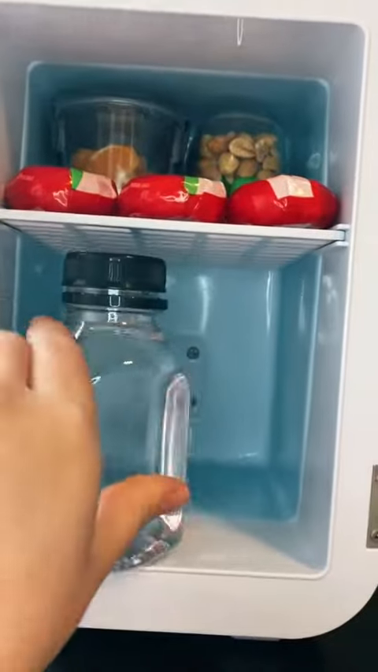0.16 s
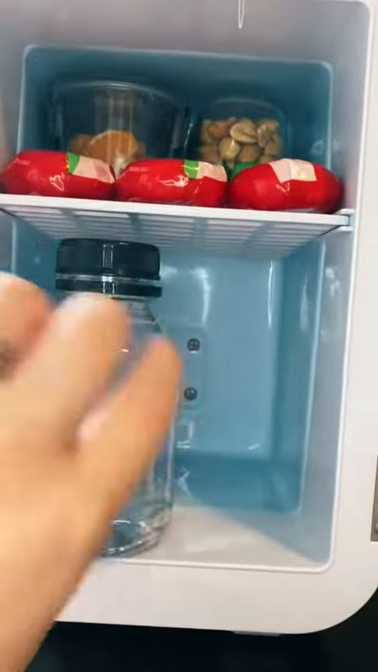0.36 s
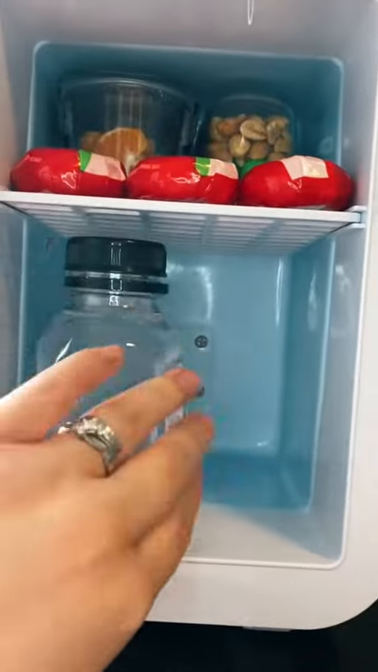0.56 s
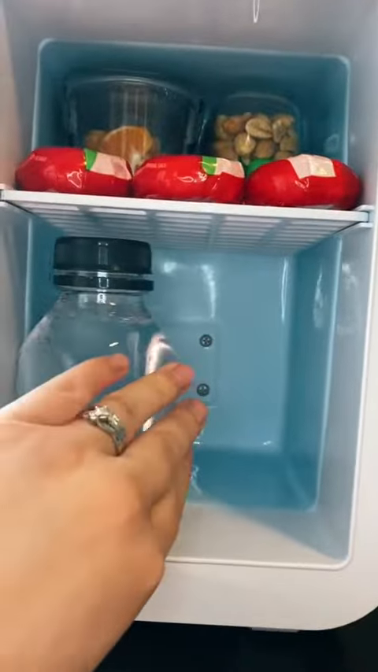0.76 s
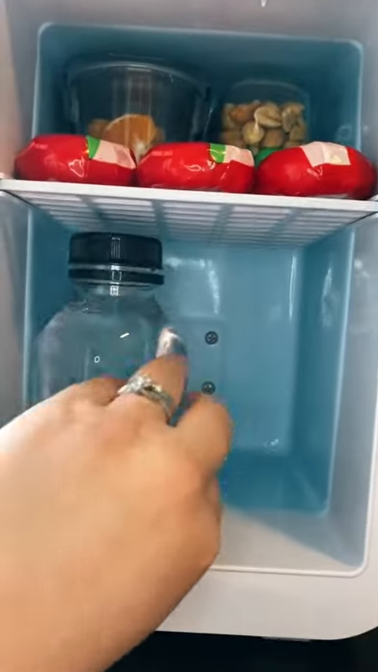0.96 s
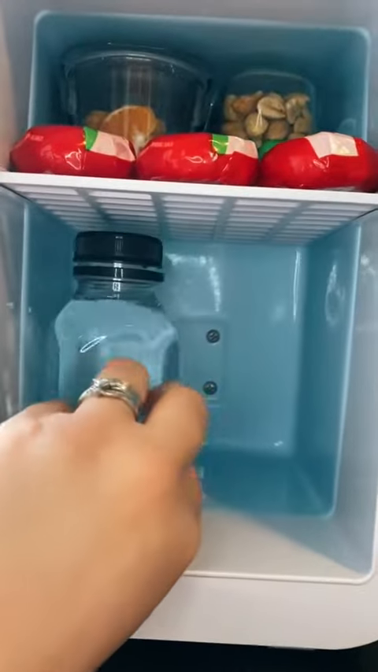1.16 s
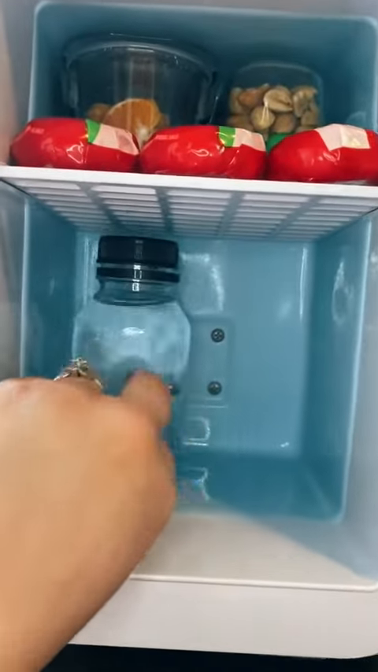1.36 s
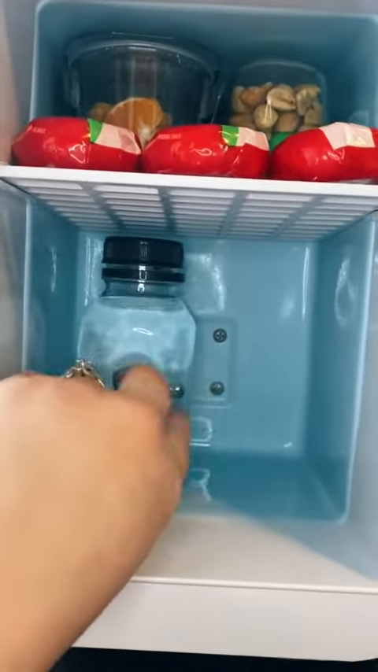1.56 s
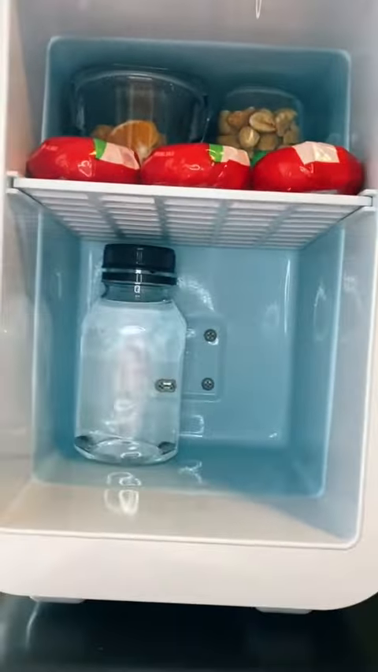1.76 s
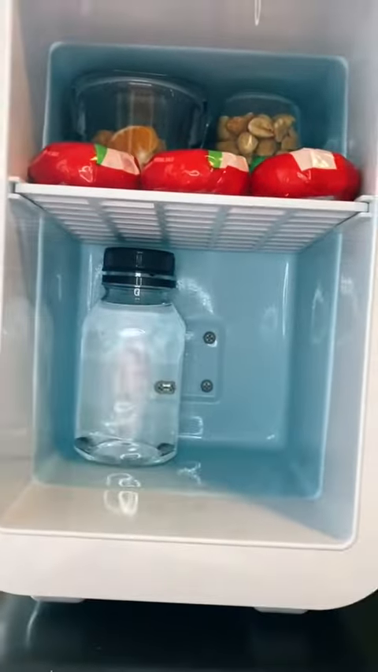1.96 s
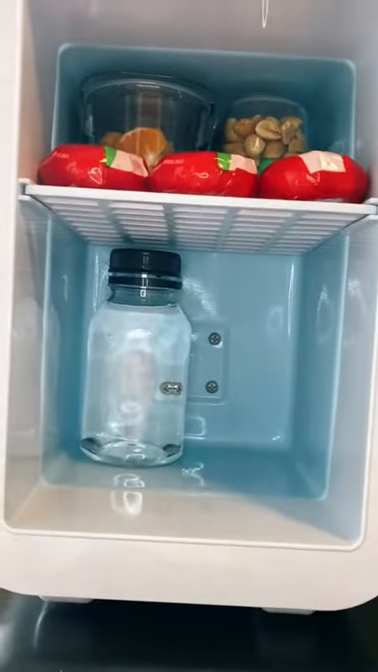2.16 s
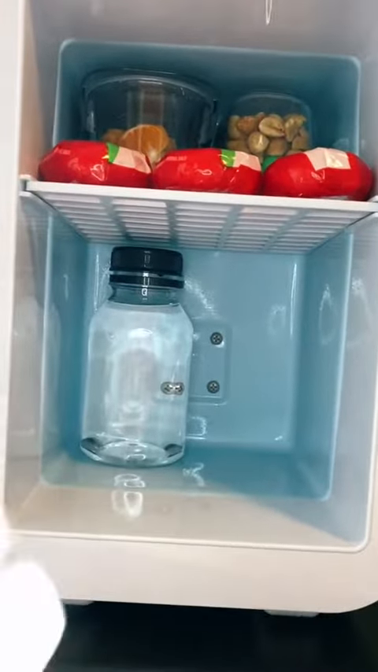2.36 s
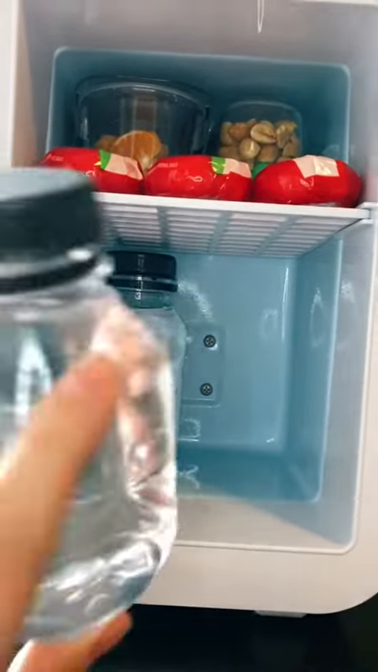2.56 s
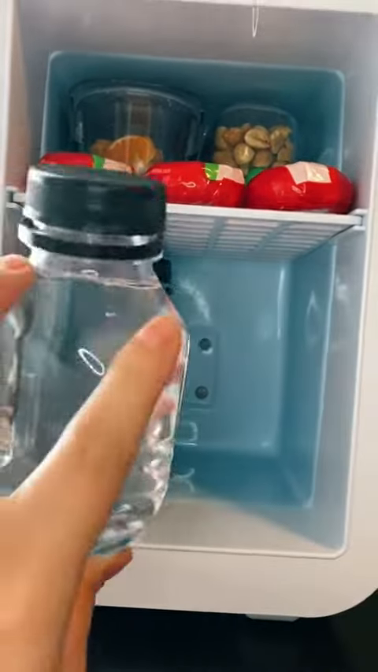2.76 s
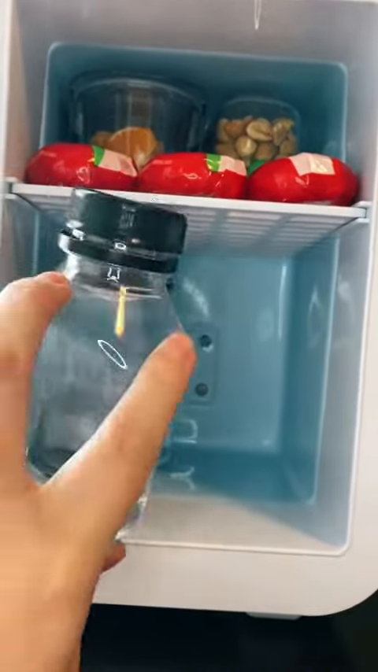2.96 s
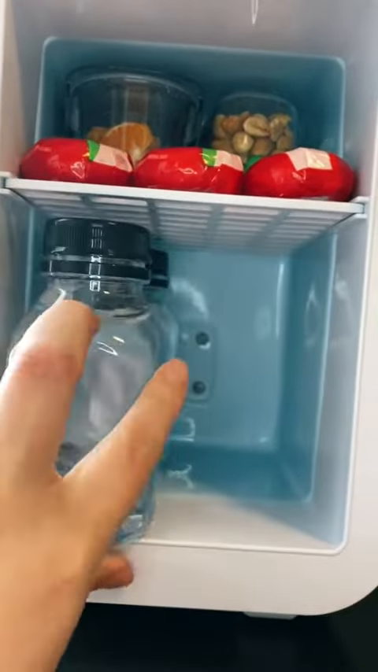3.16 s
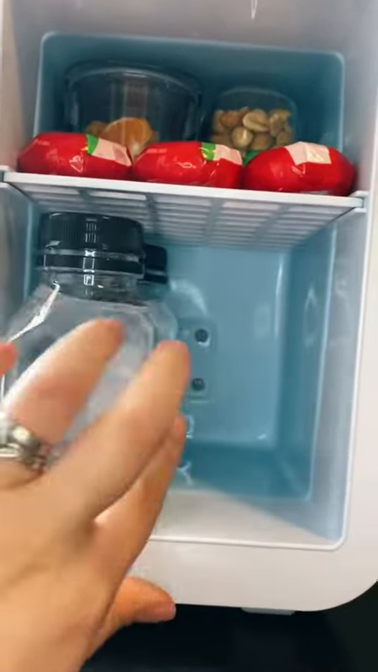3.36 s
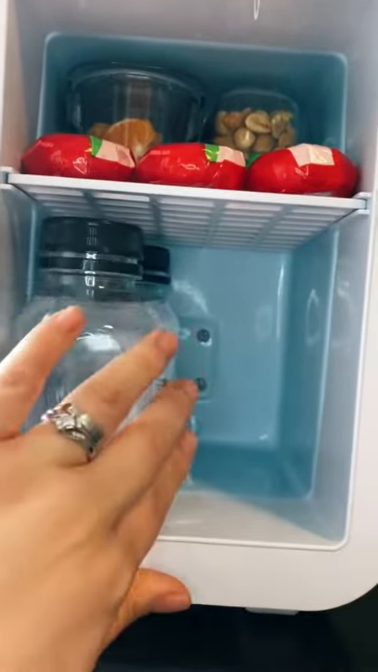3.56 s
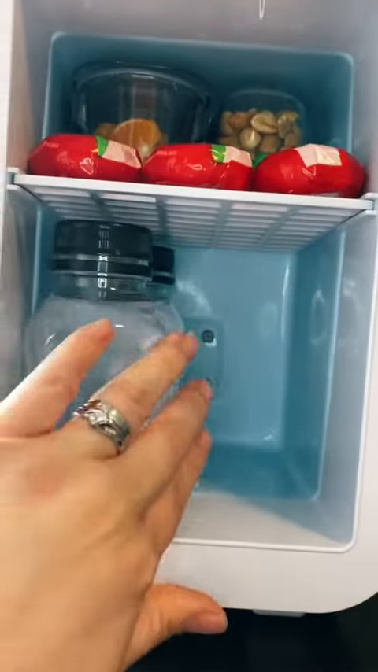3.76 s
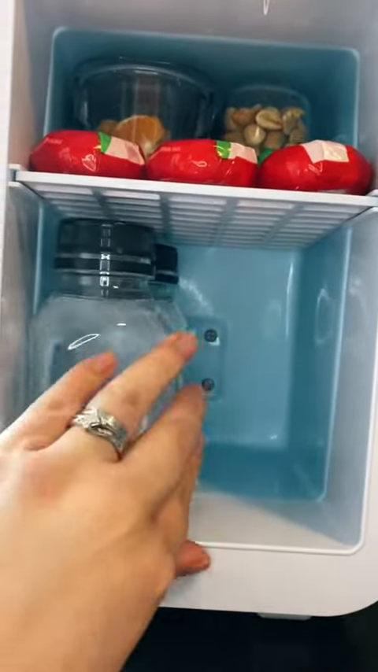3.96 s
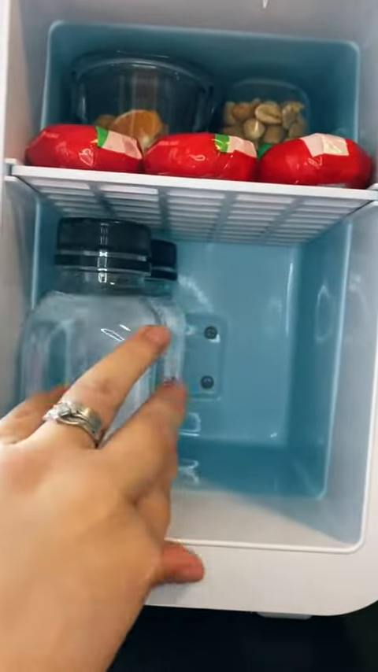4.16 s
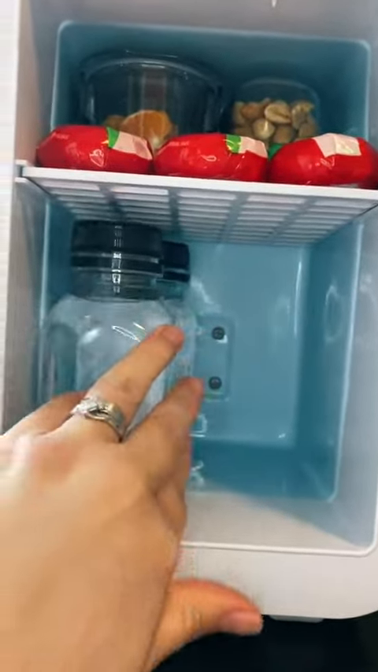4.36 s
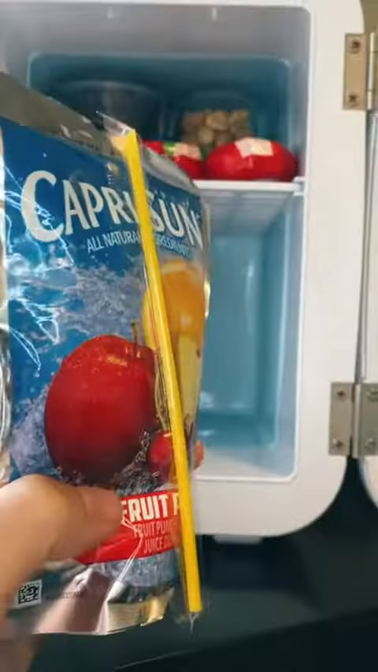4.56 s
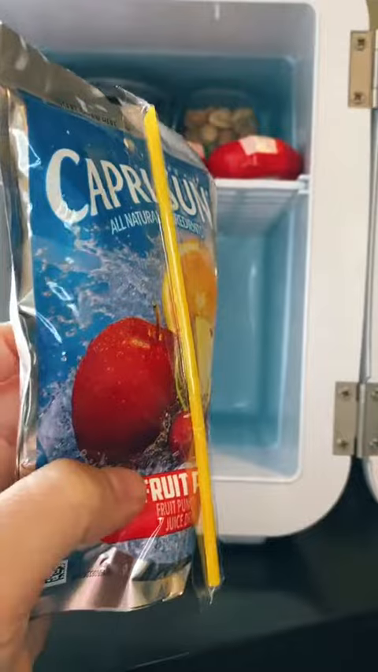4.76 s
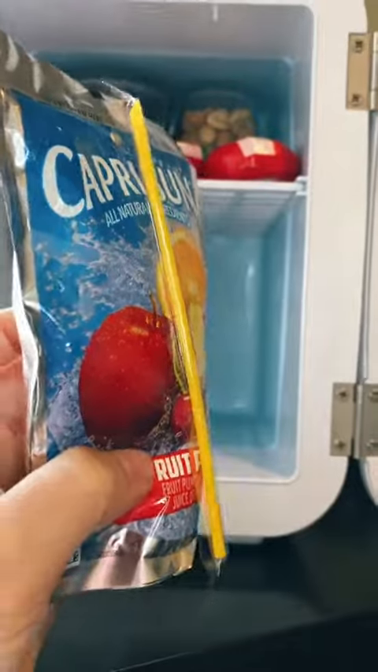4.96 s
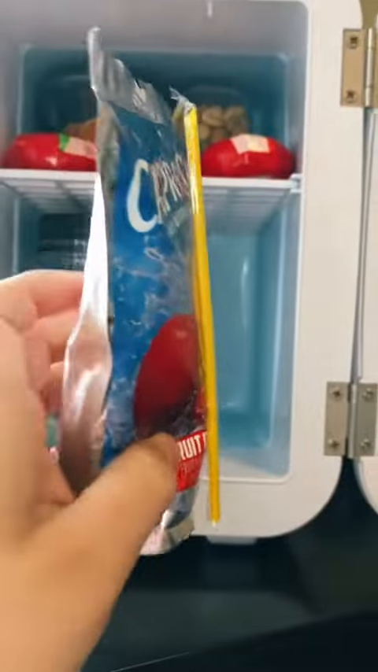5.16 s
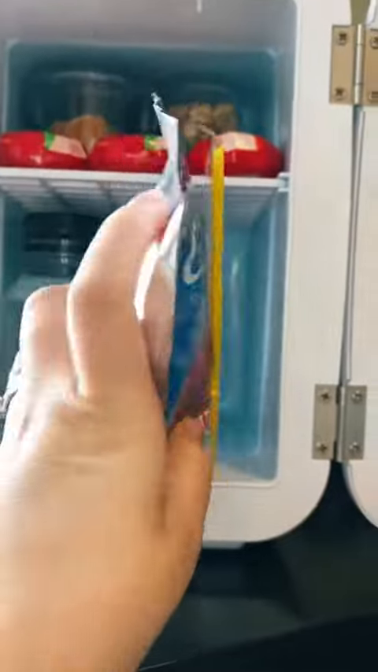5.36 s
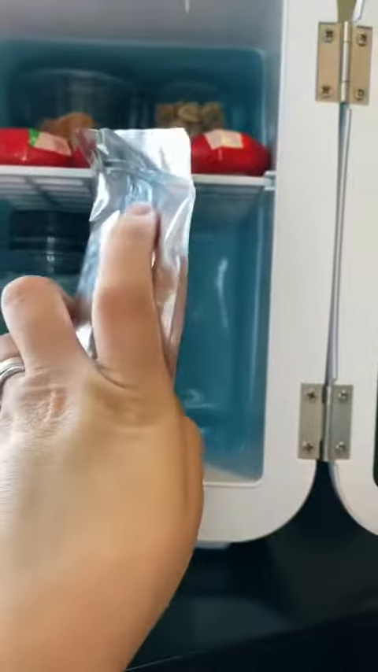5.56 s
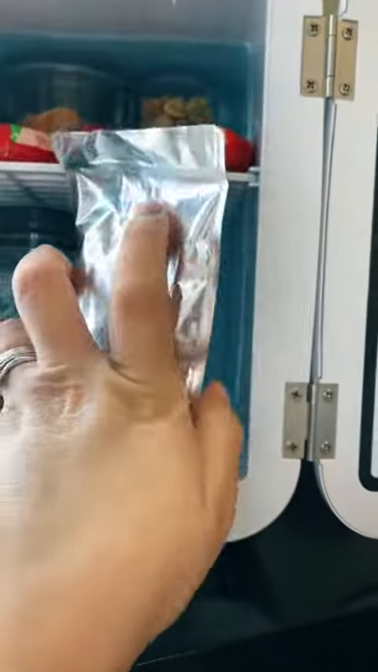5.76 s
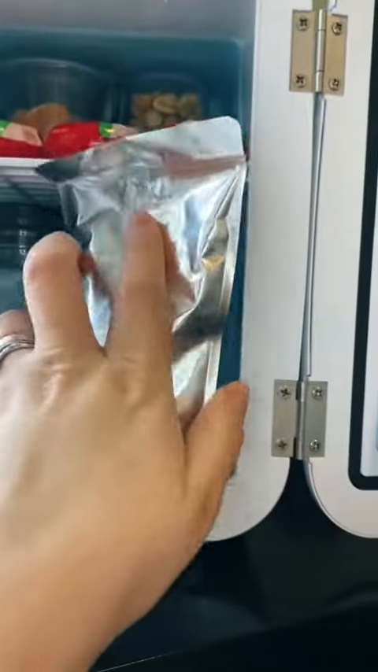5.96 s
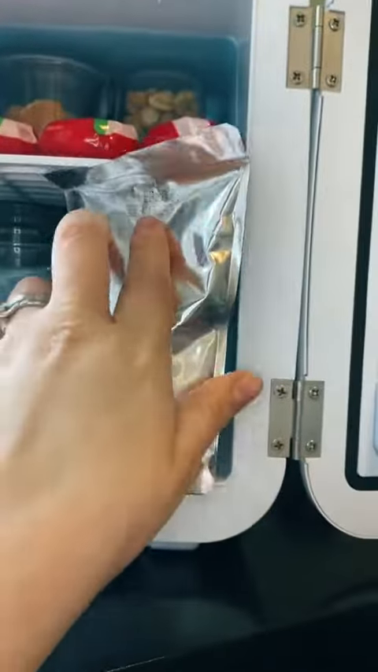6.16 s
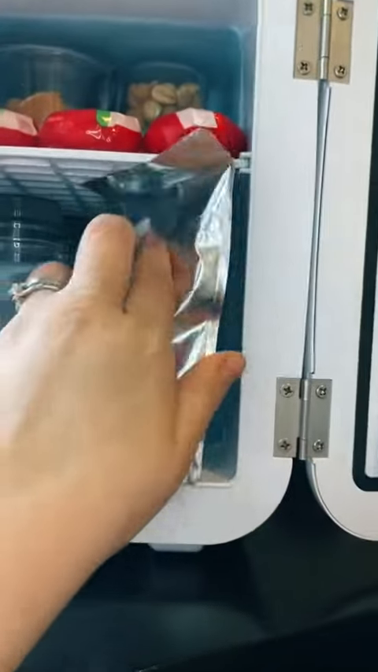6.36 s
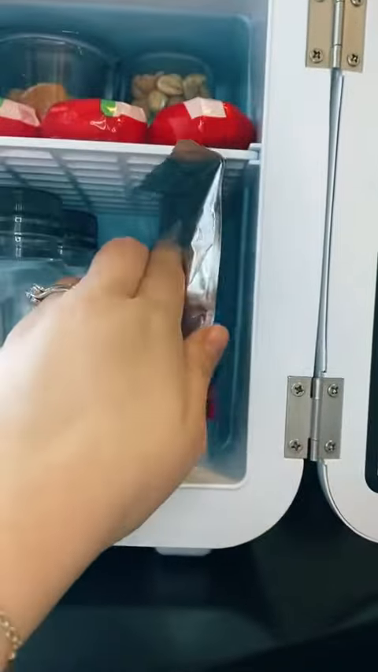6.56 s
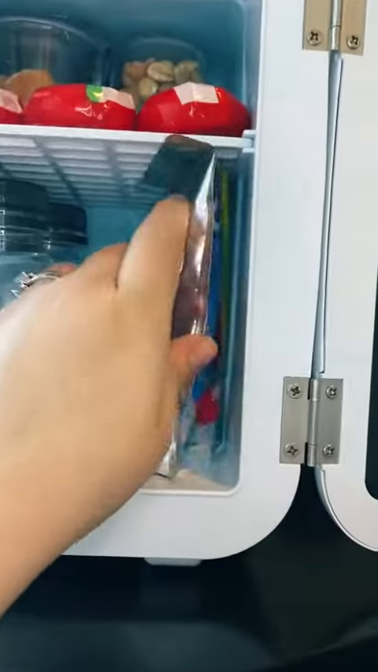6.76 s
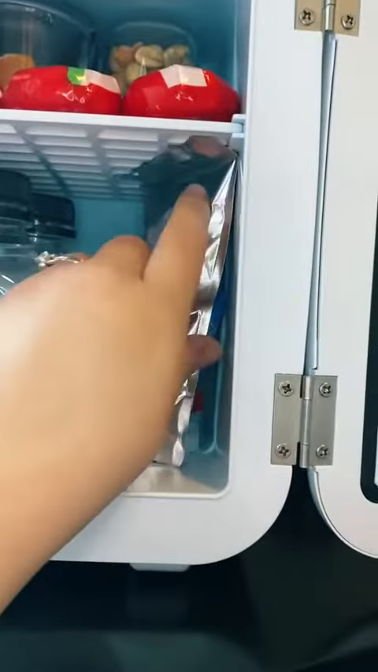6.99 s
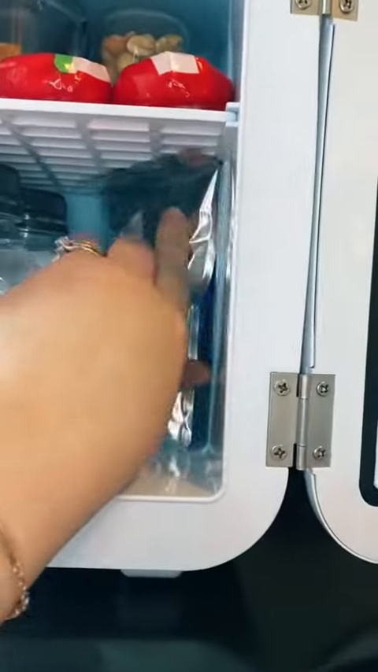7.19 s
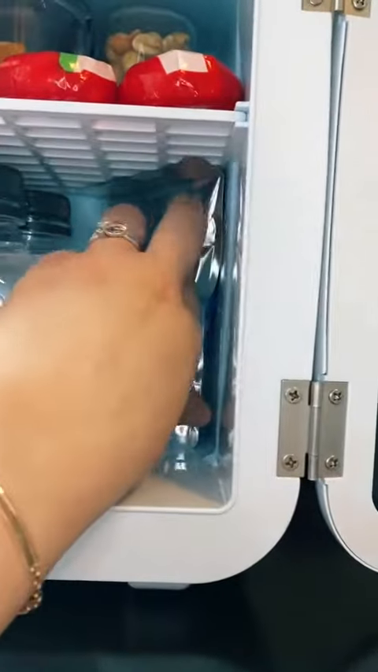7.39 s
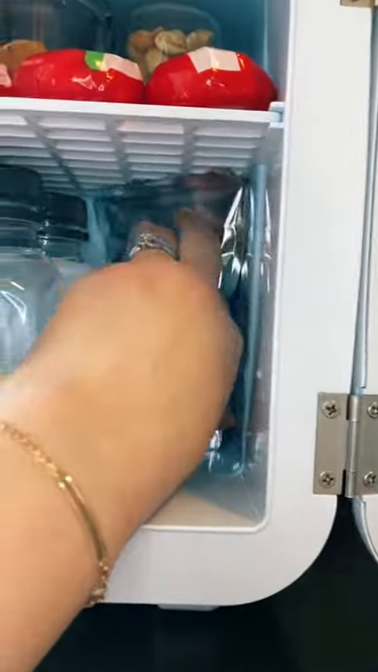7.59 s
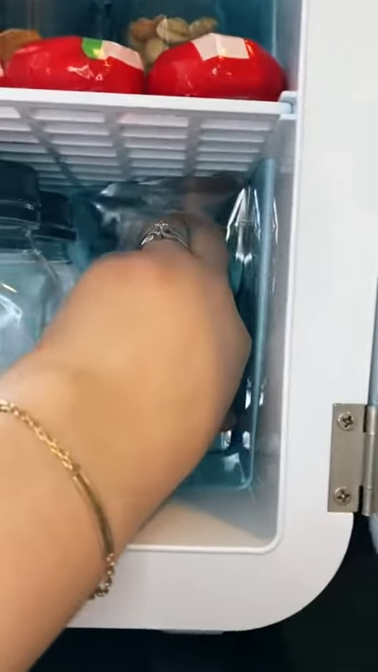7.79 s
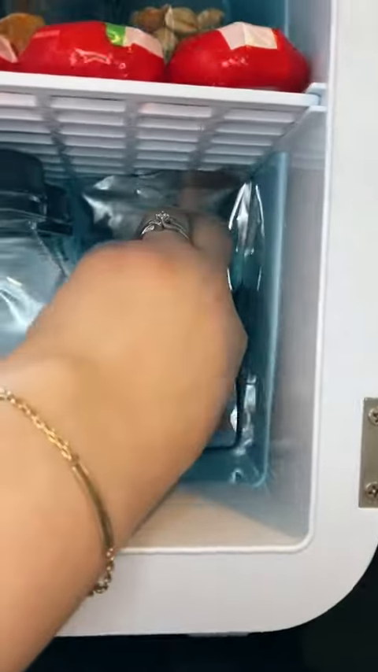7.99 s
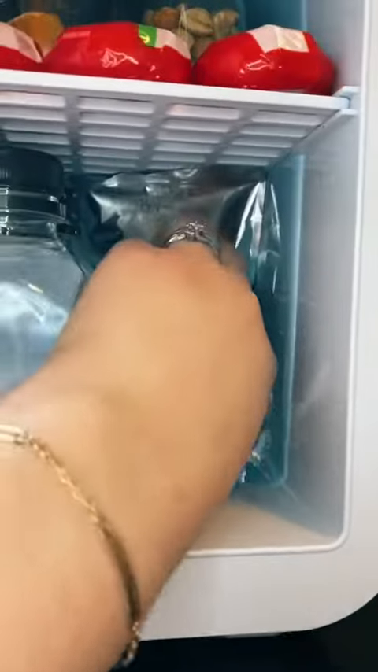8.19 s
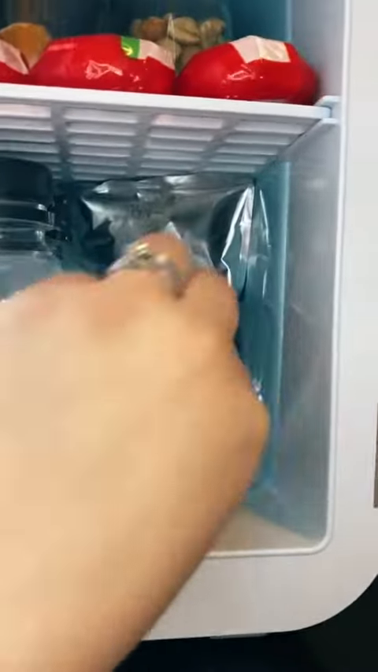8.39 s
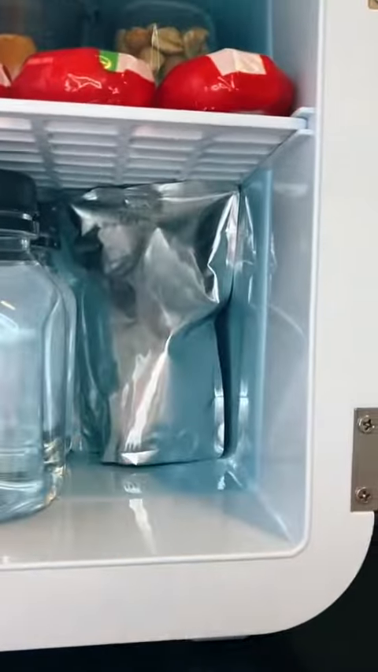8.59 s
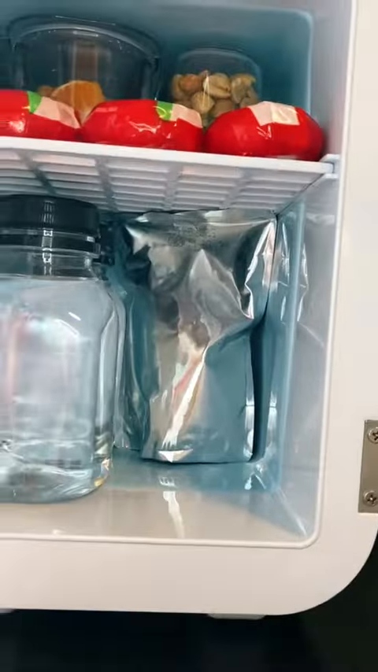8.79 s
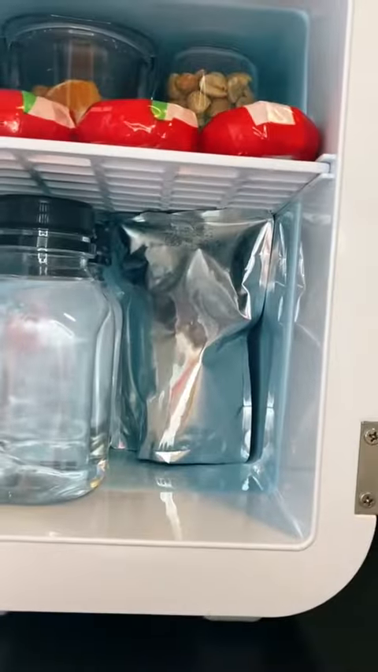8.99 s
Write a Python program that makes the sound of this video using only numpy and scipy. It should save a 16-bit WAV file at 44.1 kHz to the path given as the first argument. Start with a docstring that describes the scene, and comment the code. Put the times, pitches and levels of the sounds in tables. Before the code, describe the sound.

A faint fan hum runs throughout. Close up, a plastic bottle is set down and pushed back with clustered hollow clacks and a rubbing slide. After a quiet gap, a second bottle lands and knocks several times. A foil drink pouch then rustles, crinkles and snaps as it is shoved in, with a short squeak and soft bumps. Bottles knock lightly at the end. Small room, close microphone.

```python
"""A small fridge's cooling fan hums faintly throughout: shaped noise and slightly unsteady tones.
A plastic bottle is set down and pushed back, then a second: noise bursts and damped modes make each clack.
Next a foil drink pouch is pushed in beside them: it crinkles in tiny pops, and its snaps ring the rack.
It bumps the hollow compartment and squeaks on the wall; at the end the bottles knock once more.
All is close to the microphone in a small room, made from a decaying noise tail."""
import sys
import numpy as np
from scipy import signal
from scipy.fft import rfft, irfft, next_fast_len
from scipy.io import wavfile
from scipy.ndimage import uniform_filter1d, map_coordinates

SR = 44100
rng = np.random.default_rng(int(sys.argv[2]) if len(sys.argv) > 2 else 0)


def to_wav(sig):
    """Store sig (one row per channel, or 1-D mono) as 16-bit WAV at the path in sys.argv[1].

    Samples outside -1..1 are clipped; the rate is SR.
    """
    pcm = np.clip(np.atleast_2d(sig), -1, 1) * 32767
    pcm = np.round(pcm).astype(np.int16)
    wavfile.write(sys.argv[1], SR, pcm.T)  # frames by channels


N = 398223  # length in samples
CLOCK = np.arange(N) / SR  # s
T = np.arange(SR // 4) / SR  # time since a contact, s


def amp(db):
    """Decibels to gain."""
    return np.exp(np.asarray(db) * (np.log(10) / 20))


def unit(x):
    """Scale to rms 1."""
    return x / np.sqrt(np.mean(x ** 2) + 1e-20)


def blow(x):
    """Scale a transient to the energy of 20 ms at rms 1."""
    return x / np.sqrt(np.sum(x ** 2) / (SR / 50) + 1e-20)


def along(points, hz):
    """(f/Hz, value) points read on a log frequency axis."""
    f, value = np.transpose(points)
    return np.interp(np.log(hz + 1), np.log(f + 1), value)


def gains(rows):
    """A gain curve for each dB column after the time column; all but silent outside the rows."""
    s, *columns = np.transpose(rows)
    return [amp(np.interp(CLOCK, s, db, left=-120, right=-120)) for db in columns]


def wobble(rate):
    """A smooth random curve, rate knots a second."""
    knots = rng.standard_normal(int(N * rate / SR) + 4)
    return map_coordinates(knots, [np.arange(N) * rate / SR])


def filtered(x, response):
    """Multiply the spectrum of x by a complex response of frequency."""
    n = x.shape[-1]
    m = next_fast_len(n + 8192)
    spectrum = rfft(x, m) * response(np.fft.rfftfreq(m, 1 / SR))
    return irfft(spectrum, m)[..., :n]


def coloured(x, points):
    """Give x a broad spectral shape."""
    return filtered(x, lambda hz: amp(along(points, hz)))


def resonate(x, peaks):
    """Pass x through parallel resonances (f/Hz, width/Hz, level/dB) of alternating sign."""
    def bank(f):
        total = 0
        for k, (centre, width, db) in enumerate(peaks):
            damping = 1j * f * width
            total = total + (-1) ** k * amp(db) * damping / (centre * centre - f * f + damping)
        return total
    return filtered(x, bank)


def add(track, s, sound):
    """Mix a sound into the track at s seconds."""
    start = max(round(s * SR), 0)
    track[start:start + len(sound)] += sound[:max(N - start, 0)]


def ring(modes, rise, scatter_db, detune):
    """Damped modes (f/Hz, level/dB, t60/s), randomly varied in level and pitch at each contact."""
    chance = rng.standard_normal((len(modes), 2))
    waves = 0
    for (hz, db, t60), (level_chance, pitch_chance) in zip(modes, chance):
        decay = amp(db + scatter_db * level_chance - 60 * T / t60)
        waves = waves + decay * np.sin(2 * np.pi * hz * (1 + detune * pitch_chance) * T)
    return blow(waves * (1 - np.exp(-(T / rise) ** 2)))


def burst(rise, t60, tail_db, tail_t60):
    """A quick rattle of contact, then its weaker echoes between the fridge walls."""
    decay = amp(-60 * T / t60) + amp(tail_db - 60 * T / tail_t60)
    return decay * (1 - np.exp(-(T / rise) ** 2)) * rng.standard_normal(len(T))


def bend(x, cycles):
    """Bending waves in a thin wall: each frequency comes some of its own cycles late, so pitch falls."""
    return filtered(x, lambda hz: np.exp(-2j * np.pi * cycles * np.log(hz + 20)))


# spectrum of the fan's air noise: f/Hz, relative level/dB per Hz
FAN_AIR = [(25, -29), (55, -0.5), (100, -8), (160, -4.5), (240, -8), (300, -12), (420, -10.5), (800, -21),
           (1600, -17), (3000, -30.5), (4200, -43.5), (5300, -29), (6500, -52.5), (16000, -48)]
# motor and blade tones before the wavering: f/Hz, level/dB
FAN_TONES = [(215.3, -77), (242.2, -68), (1130, -85), (1222, -77.3), (1588, -74.2), (1803, -89),
             (2110, -86.5), (2385, -89)]
# the hum wavers in level: t/s, level/dB
FAN_WAVER = [(0, 4.5), (1.7, 3.5), (4.3, 5), (4.65, 0), (5.4, 2), (6, 4.5), (8.3, 4.5), (9, 3.5)]


def fan():
    """Soft turbulent air noise with motor and blade tones whose phase drifts slightly."""
    air = amp(-64.5) * unit(coloured(rng.standard_normal(N), FAN_AIR))
    tones = 0
    for hz, db in FAN_TONES:
        phase = 2 * np.pi * hz * CLOCK + 0.6 * wobble(5)
        tones = tones + amp(db) * np.sqrt(2) * np.sin(phase)
    return (air + tones) * amp(np.interp(CLOCK, *np.transpose(FAN_WAVER)))


# a bottle is set down or nudged: t/s, relative level/dB, weight on the floor/dB, hardness/dB,
# clack f/Hz, ring of the cap/dB, compartment f/Hz, shell f/Hz
BOTTLE_KNOCKS = [(0.049, -45.5, 5.5, -1.5, 1370, -19, 382, 170),
                 (0.1569, -28.5, 1.5, 5, 1720, -3, 384, 180), (0.579, -34.5, -4, -7, 980, -8, 404, 103),
                 (0.696, -27, -9, 6, 1510, -2, 357, 235), (0.719, -31.5, 2.5, -4, 1500, -12, 346, 91),
                 (0.739, -28, -12, -3, 1060, -27, 446, 160), (0.763, -35, -6, 1, 1000, -7, 429, 160),
                 (0.776, -33.5, -3, 2, 1410, -20, 413, 85), (0.795, -39.5, 6, -3.5, 1200, -1, 378, 91),
                 (0.82, -43, 10, -3, 1700, -1, 376, 86.5), (0.891, -24.5, -8.5, -8.5, 1010, -16, 406, 116),
                 (0.9, -49.5, -2, 10, 2060, -26, 444, 200), (0.919, -35, -9, -20, 1100, -22, 390, 118),
                 (0.932, -45, 0, -4, 1900, -25, 444, 119), (0.951, -35.5, -6, -4, 1930, -32, 377, 260),
                 (1.125, -46.5, 7, 1.5, 1203, -16, 437, 125), (1.208, -42.5, 2, -5, 1350, -2, 430, 186),
                 (1.344, -39.5, 4.5, -9, 1460, -22, 368, 105), (1.4097, -18, -5, -8, 1440, -7, 403, 215),
                 (1.412, -26, -8, 1.5, 676, -20, 489, 215), (1.435, -25.5, -10, -28, 750, -15, 359, 217),
                 (1.478, -29.5, -7, 2, 1440, -9.5, 395, 210), (2.955, -42, 3, -7, 1800, -14, 404, 233),
                 (3.0241, -25.5, 9, 4.5, 1050, -6.5, 396, 172), (3.031, -34, 0, 7, 650, -21, 345, 131),
                 (3.042, -24.5, 2.5, 2, 1020, -11, 404, 174), (3.052, -27, -2, 2.5, 650, -2.5, 352, 230),
                 (3.21, -57, -2, 6.5, 1600, -3, 382, 150), (3.312, -60, -10, 8, 1620, -7, 406, 150),
                 (3.538, -33, 0, -5, 1880, -0.5, 420, 152), (3.563, -30.5, 0.5, 0.5, 1350, -5.5, 412, 88),
                 (4.009, -28, -9, -7.5, 1920, -9, 398, 129), (4.034, -36, -3.5, -11, 1390, -4, 364, 102),
                 (4.272, -37.5, 3, 1.5, 980, -6, 430, 269), (4.283, -33, 0.5, -3, 1010, -3.5, 405, 119),
                 (4.296, -36, -12, 1, 1100, -11, 480, 169), (4.308, -23.5, -6, -8, 990, -13, 382, 260),
                 (4.317, -27, -9, -7.5, 1010, -12, 372, 130), (4.331, -30, -8, -5, 1010, -7, 380, 263),
                 (8.325, -44.5, -14, 5, 1290, 0, 380, 198), (8.337, -28.5, -8.5, -0.5, 1000, 1.5, 374, 161),
                 (8.403, -37.5, 3, 2, 1330, 0, 385, 90)]
# after a contact the bottle rocks onto its other edge, weaker and duller (s, then dB changes)
ROCK_S, ROCK_DB, ROCK_WEIGHT_DB, ROCK_HARDNESS_DB = .021, -15, 6, -3


def contacts():
    """Each knock and, unless the next one comes too soon, the rocking contact that follows it."""
    gaps = np.diff([row[0] for row in BOTTLE_KNOCKS], append=np.inf)
    for (s, db, weight_db, hardness_db, *colour), gap in zip(BOTTLE_KNOCKS, gaps):
        yield s, db, weight_db, hardness_db, *colour
        if gap > 2 * ROCK_S:
            yield s + ROCK_S, db + ROCK_DB, weight_db + ROCK_WEIGHT_DB, hardness_db + ROCK_HARDNESS_DB, *colour


def favoured(modes, hz, lift_db, octaves):
    """A contact point excites the modes near its own pitch more strongly."""
    lifted = []
    for f, db, t60 in modes:
        nearness = np.exp(-(np.log2(f / hz) / octaves) ** 2)
        lifted.append((f, db + lift_db * nearness, t60))
    return lifted


# spectra of the bottle's clack, its hard tick, and the fridge floor giving way: f/Hz, relative level/dB per Hz
CLACK_COLOUR = [(300, -23), (650, 3), (1100, 3.5), (1650, -3.5), (2300, -19), (3100, -14), (4500, -18.5),
                (9000, -46)]
TICK_COLOUR = [(1500, -1.5), (3200, 7), (5000, 7), (6200, 8), (7300, -39), (9000, -6.5), (15000, -9),
               (17000, -42)]
THUD_COLOUR = [(50, -22), (100, 12), (185, 12.5), (330, -12), (700, 4), (1500, -49)]
# resonances of the bottle, and of its stiff neck and cap: f/Hz, width/Hz, relative level/dB
BOTTLE_BODY = [(814, 16, 2.5), (983, 26, 10), (1060, 56, -9), (1510, 2460, -10.5), (1915, 266, 3)]
BOTTLE_CAP = [(2790, 2100, -2), (2958, 340, 4)]
# longer ring of a full bottle, the fridge's plastic shell, the air inside: f/Hz, relative level/dB, t60/s
BOTTLE_PING = [(631.5, 0.5, 0.19), (789, -15, 0.12), (985, 0.5, 0.094), (1084, -1, 0.091),
               (1407, -2.5, 0.096), (1588, 6.5, 0.037), (1790, -10.5, 0.28), (1906, -5.5, 0.08),
               (2755, -13.5, 0.16)]
SHELL_MODES = [(69.6, -11, 0.38), (90.8, -8.5, 0.36), (126.5, -5.5, 0.14), (177.7, -1.5, 0.22),
               (213.6, 2.5, 0.15), (250, 0, 0.12)]
HOLLOW_MODES = [(255, -5, .05), (342, -7, .08), (380, -10, .13), (441, -7, .07), (492, -8, .05)]
TICK_DB, TICK_GROWS = -10, 0.38  # the tick against the clack, and dB more per dB of the cap's ring


def bottles():
    """A hard tick and the bottle's clack come first; the compartment and shell swell just behind."""
    out = np.zeros(N)
    for s, hollow_db, weight_db, hardness_db, clack_hz, ring_db, hollow_hz, shell_hz in contacts():
        shell_db = hollow_db + weight_db
        clack_db = hollow_db + hardness_db
        cap_db = clack_db + ring_db
        tick_db = clack_db + TICK_DB + TICK_GROWS * ring_db
        # gentle nudges set in more slowly and tick less
        softness = np.interp(clack_db, [-50, -25], [2, 1])

        contact = burst(rise=0.0009 * softness, t60=0.022, tail_db=-22, tail_t60=0.16)
        wall = blow(coloured(contact, CLACK_COLOUR)) + amp(-6.0) * blow(resonate(contact, BOTTLE_BODY))
        # each contact point favours its own pitch
        spot = blow(resonate(contact, [(clack_hz, 300, 0)]))
        ping_modes = favoured(BOTTLE_PING, clack_hz, lift_db=9, octaves=.35)
        ping = ring(ping_modes, rise=.001, scatter_db=2.5, detune=.002)
        clack = blow(wall) + amp(-6) * spot + amp(-2) * ping
        cap = blow(resonate(resonate(contact, BOTTLE_CAP), BOTTLE_CAP))  # twice, for narrower peaks

        rattle = burst(rise=0.003 * softness, t60=0.014, tail_db=-34, tail_t60=0.31)
        tick = blow(coloured(rattle, TICK_COLOUR))
        give = burst(rise=.003, t60=.06, tail_db=-18, tail_t60=.18)
        thud = blow(coloured(give, THUD_COLOUR))
        shell_ring = ring([(shell_hz, 10, .075), *SHELL_MODES], rise=.0028, scatter_db=2, detune=.015)
        shell = amp(-5) * thud + shell_ring
        hollow = ring([(hollow_hz, 7, .05), *HOLLOW_MODES], rise=0.0045, scatter_db=1.5, detune=0.03)

        add(out, s, amp(clack_db - 12.0) * clack)
        add(out, s, amp(cap_db - 16.5) * cap)
        add(out, s, amp(tick_db - 10.5) / softness * tick)
        add(out, s + 0.0022, amp(hollow_db - 1.0) * hollow)
        add(out, s + 0.0014, amp(shell_db - 6.0) * bend(blow(shell), cycles=2.2))
    return out


def patchy(x, depth_db):
    """Foil facets sound in turn: random patches of gain, some 700 Hz wide and 25 ms long."""
    z = signal.stft(x, nperseg=256)[2]
    across_pitch = uniform_filter1d(rng.standard_normal(z.shape), size=4, axis=0)
    field = uniform_filter1d(across_pitch, size=9, axis=1)
    return signal.istft(z * amp(depth_db * unit(field)), nperseg=256)[1][:N]


def crackle(rate, low_hz, high_hz, spread_db, hiss, clump_db):
    """Tiny creases pop in loose clumps, each ringing a few cycles at its own pitch, over friction."""
    when, pitch, life, size = rng.random((int(rate * N / SR), 4)).T[:, :, None]
    hz = low_hz * (high_hz / low_hz) ** pitch
    t = T[:SR // 600]
    strength = amp(spread_db * -np.log(.06 + .94 * size))  # a few pops far stronger than most
    pops = strength * np.sin(2 * np.pi * hz * t) * np.exp(-t * hz / (.4 + life))
    at = (when * N).astype(int) + np.arange(len(t))
    clumps = amp(clump_db * wobble(60))
    rustle = unit(np.bincount(at.ravel(), pops.ravel())[:N]) + hiss * rng.standard_normal(N)
    return clumps * patchy(rustle, depth_db=1.6)


# fingers tighten on a bottle or on the pouch: t/s, half length/s, relative level/dB
GRIP_RUSTLES = [(0.124, 0.018, -65), (2.103, 0.017, -73), (4.016, 0.039, -63.5), (4.556, 0.015, -53),
                (4.57, 0.0049, -46.5), (4.62, 0.059, -64), (4.87, 0.28, -84.5), (5.024, 0.018, -73.5),
                (5.15, 0.039, -63), (5.253, 0.035, -68.5), (5.413, 0.024, -69), (5.488, 0.017, -55.5),
                (5.575, 0.011, -67), (5.679, 0.017, -54), (5.809, 0.0095, -51), (5.848, 0.017, -58),
                (6.026, 0.023, -63), (6.135, 0.011, -58.5), (6.264, 0.0083, -56), (6.533, 0.0032, -45),
                (6.576, 0.01, -43), (8.01, 0.012, -66), (8.072, 0.021, -54)]
# the pouch is pushed to the back: t/s, relative rub level/dB, relative crinkle level/dB
POUCH_PUSH = [(5.5, -82, -79), (5.76, -69, -60.5), (5.94, -49.5, -59.5), (6.1, -51.5, -63),
              (6.31, -47.5, -57.5), (6.49, -45.5, -54.5), (6.68, -64, -63), (6.82, -55.5, -65),
              (6.9, -43, -50.5), (7.05, -41, -49), (7.11, -37, -43.5), (7.26, -53, -56), (7.38, -46, -61),
              (7.5, -55.5, -53), (7.65, -43.5, -61), (7.77, -50.5, -57.5), (7.92, -53, -61.5),
              (7.99, -47.5, -57), (8.14, -49.5, -68.5), (8.3, -91, -97)]
# spectra of the crinkling foil and of the rubbing: f/Hz, relative level/dB per Hz
CRINKLE_COLOUR = [(1000, -15), (2000, -9), (2800, -11.5), (5100, -4.5), (6200, -5.5), (7300, -23),
                  (9000, -9.5), (12000, -12), (15300, -9), (16500, -25.5)]
RUB_COLOUR = [(350, -40), (600, 3), (738, -3.5), (934, -5), (1420, -4.5), (1860, -6.5), (2260, -0.5),
              (2680, -5), (3500, -8), (4550, -41), (7700, -120)]


def handling():
    """Gripping rustles briefly; the pushed pouch rubs and crinkles in uneven spurts of tiny pops."""
    rub, crinkle = gains(POUCH_PUSH)
    grip = sum(amp(db) * np.exp(-((CLOCK - s) / half) ** 2 / 2) for s, half, db in GRIP_RUSTLES)
    spurts = amp(1.5 * wobble(22))
    creases = crackle(rate=5000, low_hz=2500, high_hz=14000, spread_db=3.3, hiss=.65, clump_db=1.5)
    slips = crackle(rate=2500, low_hz=900, high_hz=3500, spread_db=3.2, hiss=.8, clump_db=1.3)
    foil = (amp(1.5) * crinkle * spurts + grip) * unit(coloured(creases, CRINKLE_COLOUR))
    skin_level = amp(-6.0) * rub * spurts + amp(-16.0) * grip
    return foil + skin_level * unit(coloured(slips, RUB_COLOUR))


# the first bottle is pushed over the floor: t/s, relative effort level/dB
BOTTLE_PUSH = [(0.55, -49), (0.636, -44.5), (0.766, -43), (1.004, -52), (1.176, -46.5), (1.344, -45),
               (1.446, -50), (1.574, -74), (1.7, -77)]
# spectrum of the muttering floor: f/Hz, relative level/dB per Hz
DRAG_COLOUR = [(21, -38), (35, -28.5), (108, -0.5), (150, -8), (189, 3), (216, -4.5), (246, 0),
               (296, -11.5), (384, 4), (427, 3), (547, -18.5), (800, -14.5), (1040, -36.5), (1760, -120)]
SKIN_DB = -26  # fingers slipping on the bottle, against the effort of the push
BOTTLE_DRAG_DB, POUCH_DRAG_DB = -2, -6  # muttering of the floor, against the effort and the rub


def sliding():
    """Fingers slip on the pushed bottle as uneven hiss; dragged loads make the fridge floor mutter."""
    effort, rub = gains(BOTTLE_PUSH)[0], gains(POUCH_PUSH)[0]
    slipping = rng.standard_normal(N) * amp(1.7 * wobble(30.9))
    skin = amp(SKIN_DB) * effort * unit(coloured(slipping, TICK_COLOUR))
    judder = rng.standard_normal(N) * amp(5 * wobble(35))
    load = amp(BOTTLE_DRAG_DB) * effort + amp(POUCH_DRAG_DB) * rub
    return skin + load * unit(coloured(judder, DRAG_COLOUR))


# a light tap on the compartment: f/Hz, relative level/dB, t60/s
TAP_MODES = [(353, -14.5, 0.13), (396, -11, 0.11), (491, -4.5, 0.013), (548, -2, 0.031), (633, -10, 0.043)]


def tap(hz):
    """The compartment's short answer to a light touch, pitched by where it lands."""
    hollow = ring([(hz, 2.0, 0.04), *TAP_MODES], rise=0.0027, scatter_db=4.0, detune=0.033)
    return blow(coloured(hollow, [(120, -11.5), (290, -2.5)]))


def buckling(swell, length, tail_db, tail_t60):
    """A crease gives way: noise swells to a peak 10 ms in, collapses in a few ms, then echoes faintly."""
    t = T - 1 / 100
    collapse = np.exp(-(t / length) ** 2) + amp(tail_db - 60 * np.abs(t) / tail_t60)
    shape = np.where(t < 0, np.exp(-np.abs(t) / swell), collapse)
    return shape * rng.standard_normal(len(t))


# the pouch buckles: t/s, relative panel level/dB, panel f/Hz, sharpness of the foil's crack/dB, compartment f/Hz
POUCH_SNAPS = [(4.564, -54.5, 3300, -7, 396), (5.187, -48, 2100, -24, 343), (5.462, -40.5, 940, -4.5, 367),
               (5.699, -53.5, 1380, -10, 532), (5.739, -62, 2150, 24, 400), (5.869, -41.5, 2630, -4.5, 456),
               (5.933, -37, 2490, -22, 445), (6.048, -40.5, 1700, -10, 357), (6.244, -43.5, 2180, -17, 405),
               (6.337, -39.5, 1940, 5.5, 394), (6.346, -36.5, 1510, -6.5, 407),
               (6.368, -25, 1760, -46, 349), (6.372, -29, 1020, -29, 349), (6.45, -39, 1970, 0.5, 400),
               (6.569, -48, 1500, -12.5, 403), (6.588, -23.5, 1990, 9.5, 440),
               (6.771, -42, 2150, -18.5, 402), (6.858, -46.5, 2410, 13.5, 400),
               (6.909, -24, 2020, 9.5, 473), (6.951, -33.5, 2395, -9, 434), (6.971, -43, 2350, 14, 404),
               (7.034, -29.5, 1860, -6.5, 442), (7.045, -28.5, 1960, 13.5, 368),
               (7.072, -36, 1840, -6.5, 330), (7.117, -28, 1940, 13, 383), (7.216, -24.5, 1280, 8.5, 470),
               (7.254, -29.5, 1330, 2.5, 457), (7.304, -55.5, 1300, 9.5, 400), (7.446, -36, 1320, -15, 446),
               (7.464, -25.5, 1300, 10, 480), (7.501, -24.5, 1240, -2.5, 448), (7.68, -25, 2180, 9, 414),
               (7.73, -24.5, 1010, -5.5, 457), (7.794, -39, 1280, -11, 376), (7.854, -62.5, 1170, 22, 371),
               (7.973, -61.5, 2400, 14, 400), (8.091, -45, 1000, -2, 468), (8.12, -52.5, 1090, 14, 400),
               (8.335, -41, 3300, 1, 373), (8.402, -57, 3260, 11, 372)]
# spectra of the sharp foil and of the flexing panel: f/Hz, relative level/dB per Hz
SPLINTER_COLOUR = [(1200, -13), (3000, -8), (6000, -1.5), (7300, -10), (9000, -4.5), (12000, -8.5),
                   (15200, -2), (17000, -22.5)]
CRACK_COLOUR = [(300, -33.5), (700, 8.5), (1100, 12.5), (2000, 4), (3200, 5.5), (5000, -7.5),
                (10000, -41.5)]
# resonances of the pouch: f/Hz, width/Hz, relative level/dB
FOIL_PEAKS = [(2950, 1800, -9.5), (4630, 150, 20), (4970, 800, 11), (6465, 181, 10), (9000, 590, -21),
              (9800, 170, -13), (12330, 554, -2), (13400, 84.5, 19.5), (13800, 1300, -0.5)]
# thin ring of the rack's bars: f/Hz, relative level/dB, t60/s
RACK_MODES = [(1290, 0, 0.21), (2050, 10.5, 0.13), (2380, 1, 0.13), (2500, 6, 0.17), (3360, 4, .2),
              (3670, -1.5, 0.22), (4350, 5, 0.14), (4790, -6, 0.14), (5130, 2, 0.158), (5130, -7, .15),
              (5590, -11.5, 0.25), (8075, -7.5, 0.057), (12360, -13, .38), (13870, -15, .14)]
ANSWER_DB, ANSWER_GROWS = -3, 0.25  # compartment against panel, and dB more per dB of sharpness


def snaps():
    """The foil buckles; a panel of the pouch rings briefly, and the rack and compartment answer."""
    out = np.zeros(N)
    for s, panel_db, panel_hz, sharp_db, hollow_hz in POUCH_SNAPS:
        foil_db = panel_db + sharp_db
        hollow_db = panel_db + ANSWER_DB + ANSWER_GROWS * sharp_db
        buckle = buckling(swell=0.0015, length=0.0041, tail_db=-18.5, tail_t60=0.11)
        foil = blow(coloured(buckle, SPLINTER_COLOUR)) + amp(-7.0) * blow(resonate(buckle, FOIL_PEAKS))
        bars = amp(-15) * ring(RACK_MODES, rise=.005, scatter_db=2, detune=.001)
        flex = buckling(swell=.0014, length=.0045, tail_db=-21, tail_t60=.16)
        panel_ring = blow(resonate(flex, [(panel_hz, 180, 0)]))
        panel = blow(coloured(flex, CRACK_COLOUR)) + amp(-1.0) * panel_ring
        # start early: the buckling peaks 10 ms in
        add(out, s - .008, amp(foil_db - 9.5) * (blow(foil) + bars))
        add(out, s - .008, amp(panel_db - 4.0) * blow(panel))
        add(out, s + 0.00313, amp(hollow_db - 4.0) * tap(hollow_hz))
    return out


# the soft pouch bumps floor and walls: t/s, relative level/dB, weight on the floor/dB, compartment f/Hz, shell f/Hz
POUCH_BUMPS = [(5.462, -37.5, -5, 374, 234), (5.518, -45.5, -7, 390, 242), (5.696, -49.5, -9, 532, 160),
               (6.484, -40.5, -10, 370, 242), (6.909, -39, -10, 470, 118), (7.009, -35, -16, 342, 188),
               (7.127, -25.5, -23, 377, 130), (7.446, -29, -39, 453, 264.5), (7.592, -36, -19, 355, 209.7),
               (7.681, -35, 2, 409, 96), (7.814, -40.5, -15, 380, 248.5), (7.854, -34, -5.5, 372, 173.5),
               (7.998, -39.5, -6, 416, 192), (8.089, -43.5, -2, 465, 117)]


def bumps():
    """The soft, full pouch slaps the compartment and gives its wall one quickly damped, falling thump."""
    out = np.zeros(N)
    for s, db, weight_db, hollow_hz, shell_hz in POUCH_BUMPS:
        contact = burst(rise=0.0045, t60=0.068, tail_db=-16.0, tail_t60=0.25)
        slap = blow(coloured(contact, CRACK_COLOUR))
        thump = ring([(shell_hz, 0, 0.03)], rise=0.0014, scatter_db=1.5, detune=0.02)
        add(out, s, amp(db - 13.5) * slap)
        add(out, s + .003, amp(db - 1.5) * tap(hollow_hz))
        add(out, s, amp(db + weight_db) * bend(thump, cycles=1.3))
    return out


# foil sticks and slips on the wall: t/s, level/dB, f/Hz
FOIL_SQUEAK = [(6.382, -50.5, 1800), (6.461, -58.5, 1860), (6.495, -53.5, 1980), (6.51, -44.5, 2000),
               (6.55, -45, 2040), (6.575, -40, 1990), (6.588, -62, 2073)]


def squeak():
    """Foil scrapes along the wall: a gliding tone made rough by fast random changes of level and phase."""
    s, db, hz = np.transpose(FOIL_SQUEAK)
    phase = 2 * np.pi * np.cumsum(np.interp(CLOCK, s, hz)) / SR
    slipping = wobble(650) * np.sin(phase) + wobble(650) * np.cos(phase)
    return gains(np.c_[s, db])[0] * unit(slipping)


# decay of the room: f/Hz, t60/s
ROOM_DECAY = [(100, 0.38), (500, 0.36), (2000, 0.33), (6000, 0.33), (15000, 0.088)]


def room(x):
    """A diffuse tail of noise, each frequency dying at its own speed, after a gap of about 7 ms."""
    hz, t, z = signal.stft(rng.standard_normal(SR // 2), SR, nperseg=256)
    decay = amp(-60 * t / along(ROOM_DECAY, hz)[:, None])
    tail = signal.istft(z * decay, SR, nperseg=256)[1]
    delayed = np.pad(x, (SR // 150, 0))
    return signal.fftconvolve(delayed, tail / np.linalg.norm(tail))[:N]


# stereo spread: f/Hz, relative side level/dB
SIDE_WIDTH = [(200, -35), (350, -25), (600, -21), (1200, -25), (3000, -19), (9000, -19), (14000, -6)]


def stereo(x):
    """Nearly mono; side walls shift phase between channels and diffuse sound parts them, most in the treble."""
    def phase_shift(hz):
        return 1j * map_coordinates(rng.standard_normal(SR // 120 + 2), [hz / 60])
    spread = amp(-6.0) * filtered(x, phase_shift) + amp(3.5) * room(x)
    side = coloured(spread, SIDE_WIDTH)
    return np.array([x + side, x - side])


def scene():
    """Contacts and handling in the room, over the fan."""
    hum = fan()
    near = bottles() + handling() + sliding() + snaps() + bumps() + squeak()
    return stereo(near + amp(-15.0) * room(near) + hum)


TOP_HZ = 15900  # the microphone's band limit


def record(dry):
    """The microphone sheds deep rumble and keeps next to nothing above its band limit."""
    rumble_cut = signal.butter(2, 42, "highpass", fs=SR, output="sos")
    thinned = signal.sosfilt(rumble_cut, dry)
    return filtered(thinned, lambda hz: 1 / np.sqrt(1 + (hz / TOP_HZ) ** 160))


dry = scene()
out = record(dry)
to_wav(out)
```